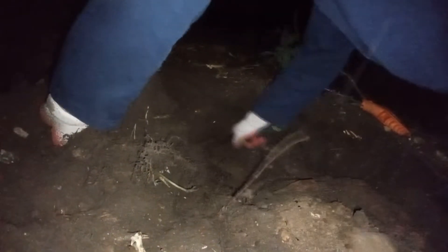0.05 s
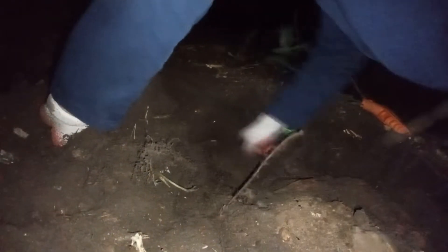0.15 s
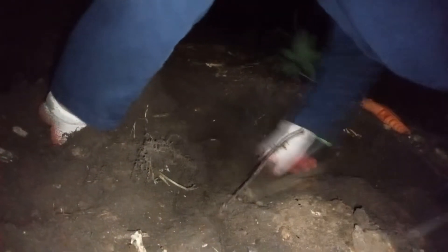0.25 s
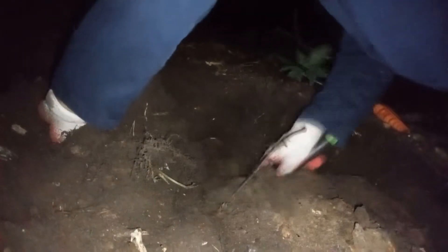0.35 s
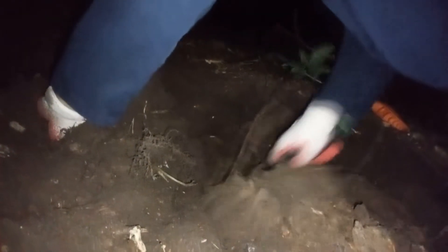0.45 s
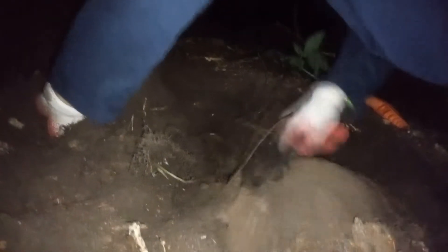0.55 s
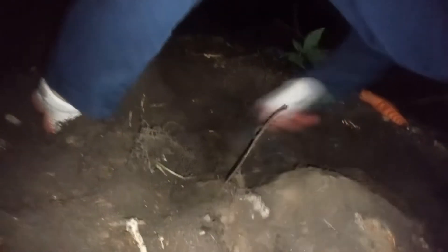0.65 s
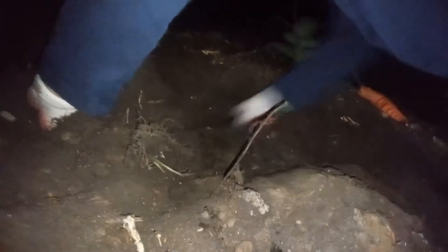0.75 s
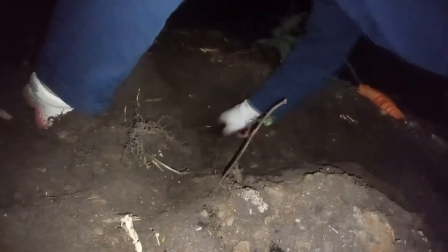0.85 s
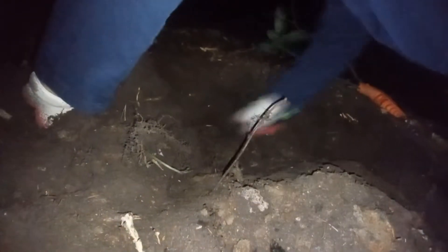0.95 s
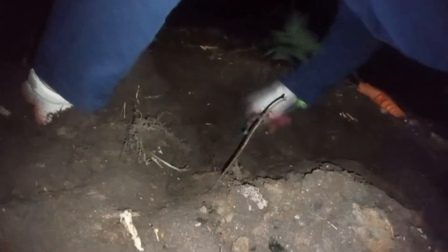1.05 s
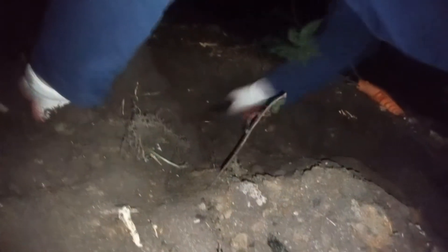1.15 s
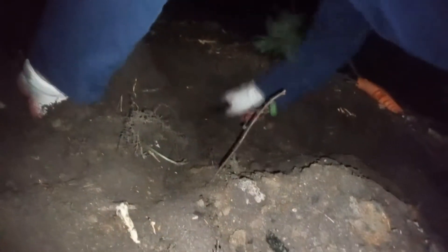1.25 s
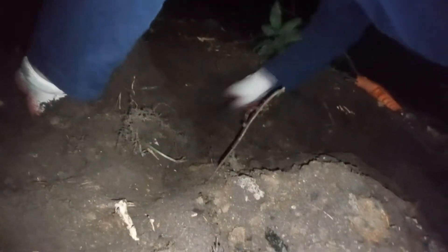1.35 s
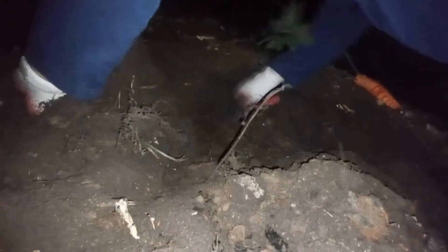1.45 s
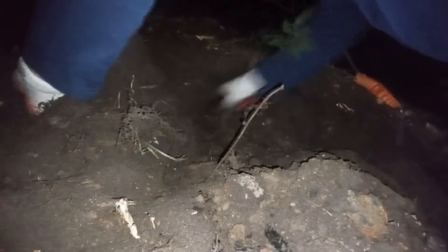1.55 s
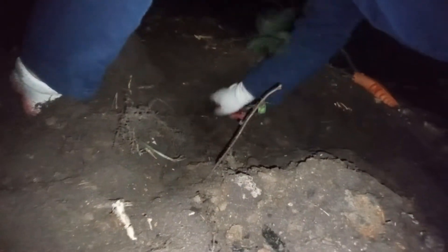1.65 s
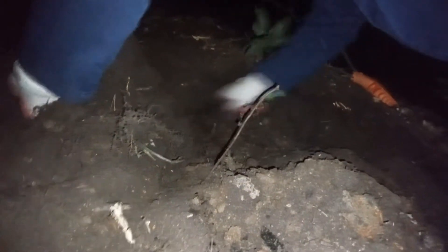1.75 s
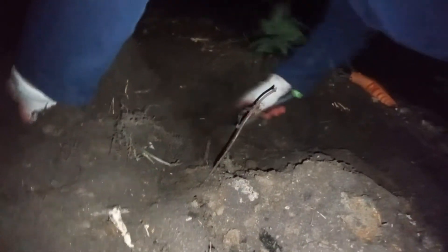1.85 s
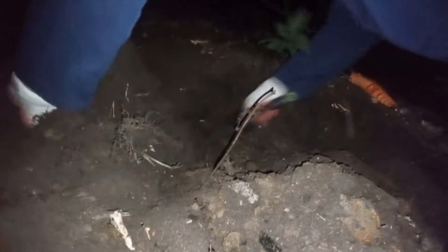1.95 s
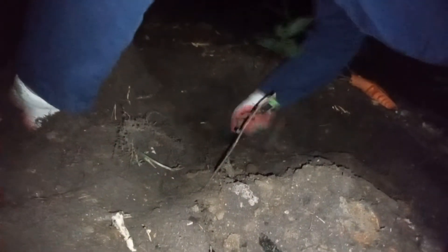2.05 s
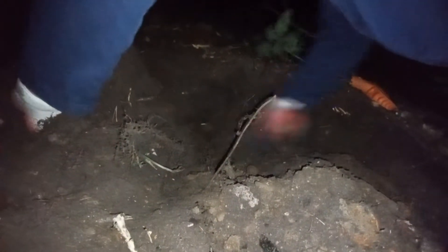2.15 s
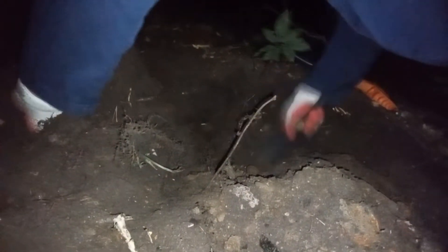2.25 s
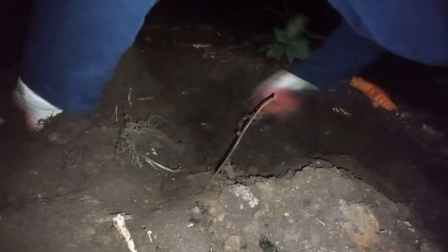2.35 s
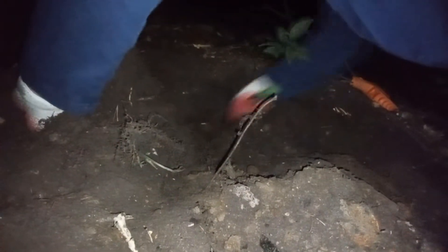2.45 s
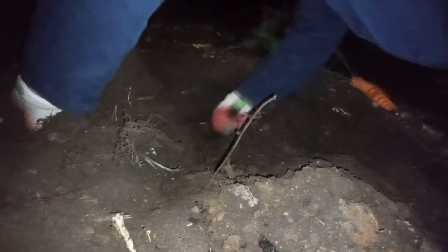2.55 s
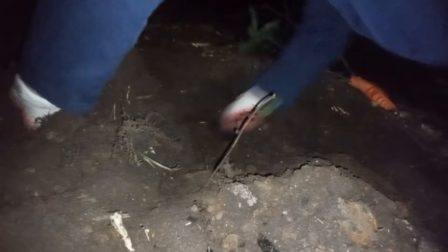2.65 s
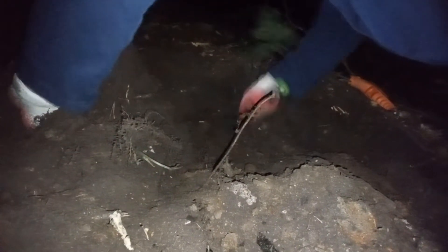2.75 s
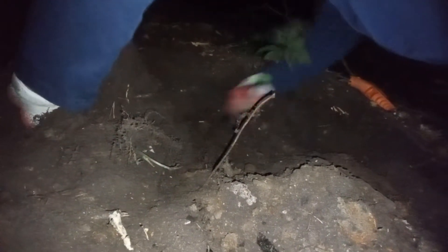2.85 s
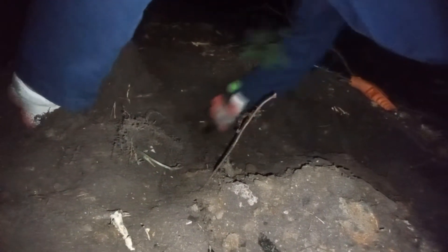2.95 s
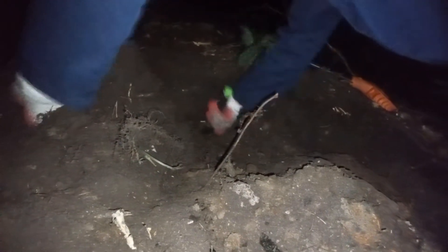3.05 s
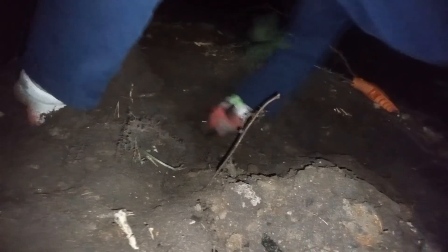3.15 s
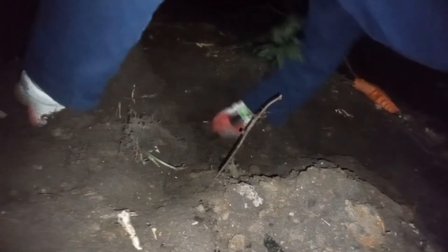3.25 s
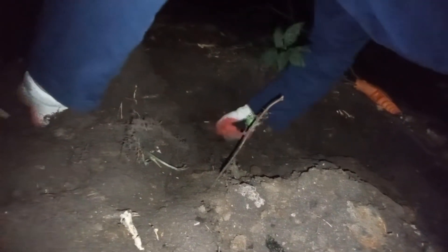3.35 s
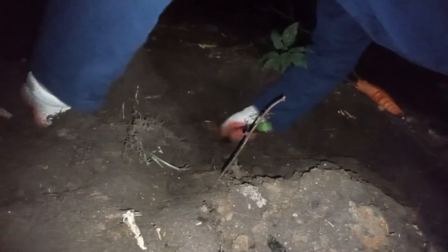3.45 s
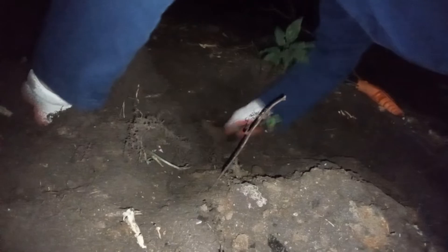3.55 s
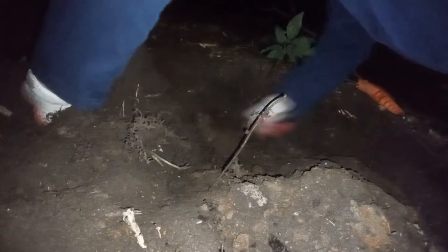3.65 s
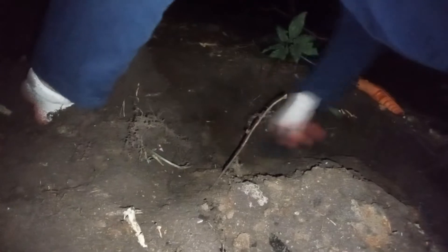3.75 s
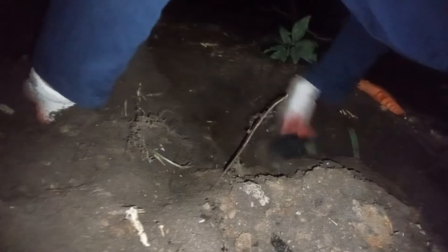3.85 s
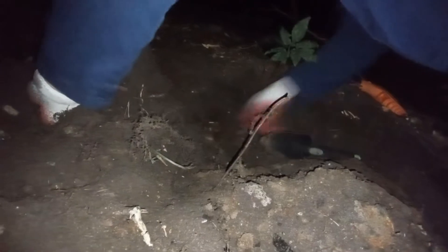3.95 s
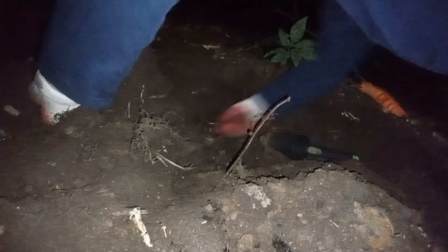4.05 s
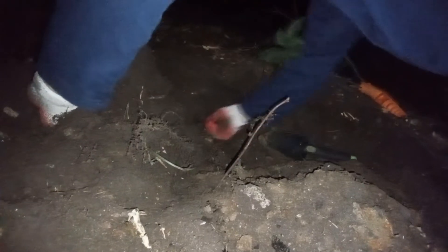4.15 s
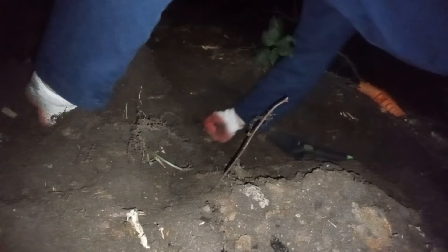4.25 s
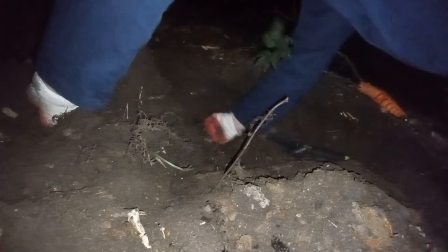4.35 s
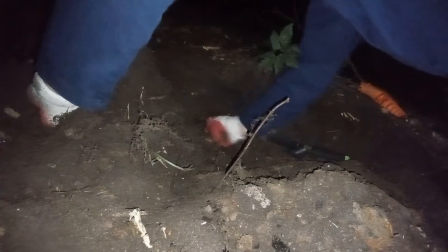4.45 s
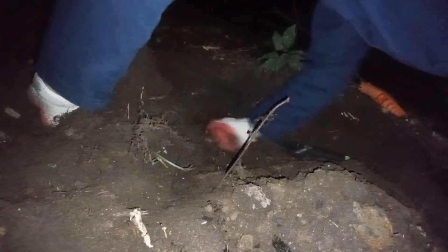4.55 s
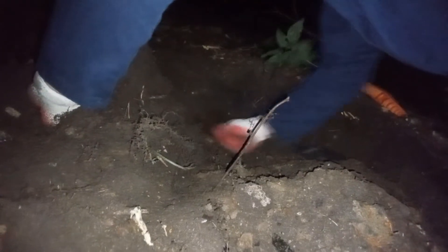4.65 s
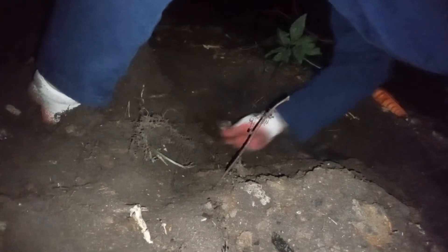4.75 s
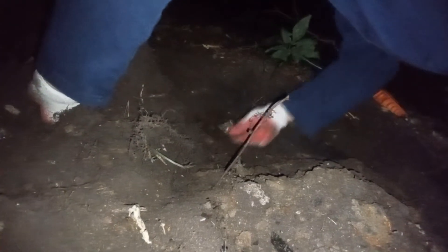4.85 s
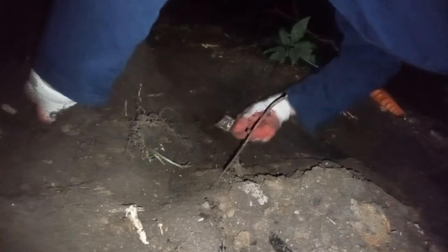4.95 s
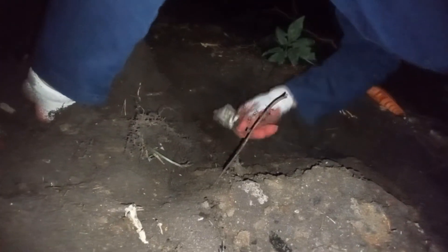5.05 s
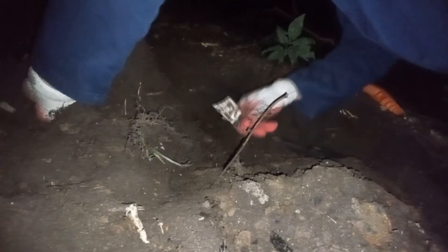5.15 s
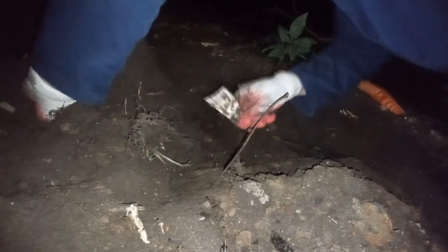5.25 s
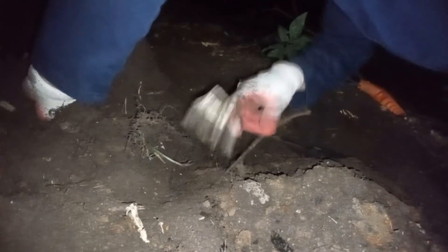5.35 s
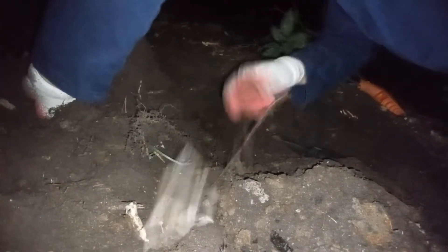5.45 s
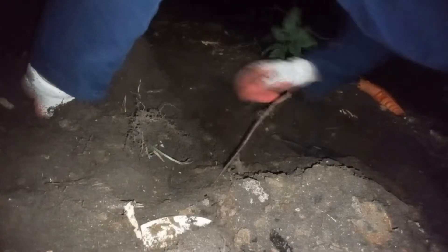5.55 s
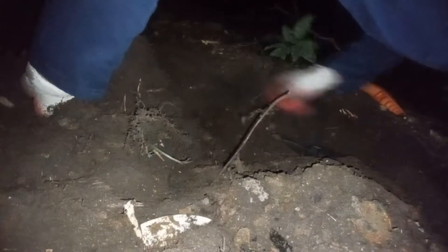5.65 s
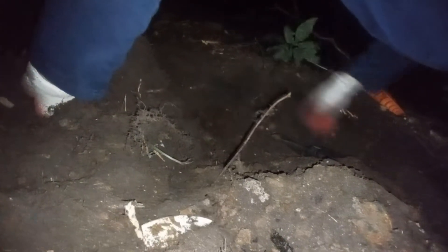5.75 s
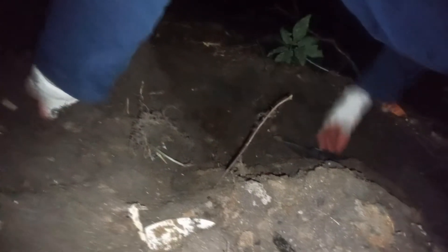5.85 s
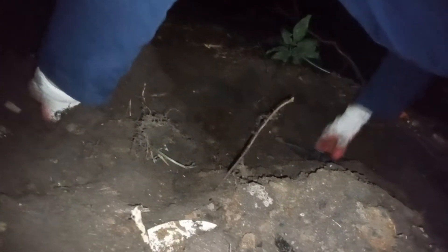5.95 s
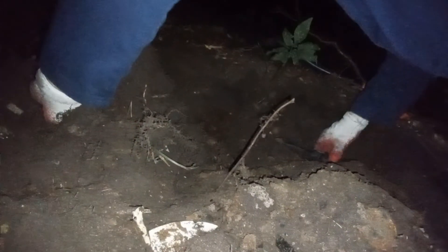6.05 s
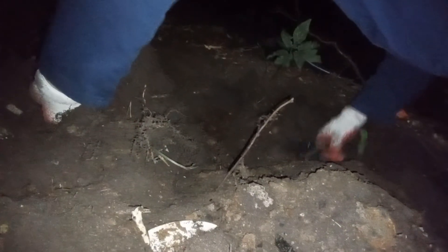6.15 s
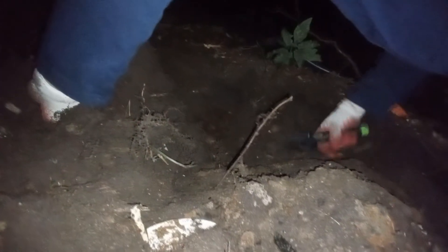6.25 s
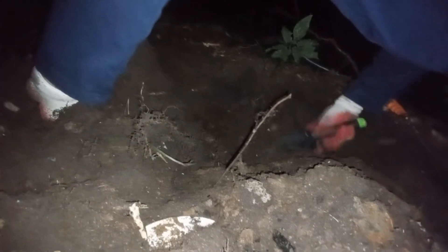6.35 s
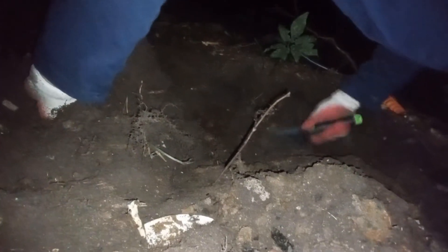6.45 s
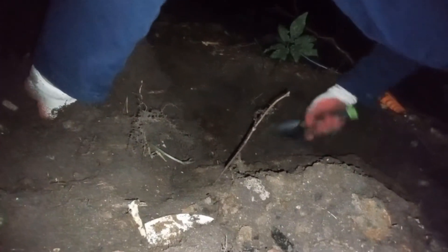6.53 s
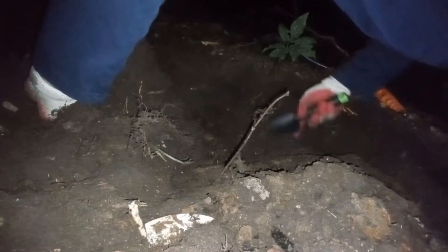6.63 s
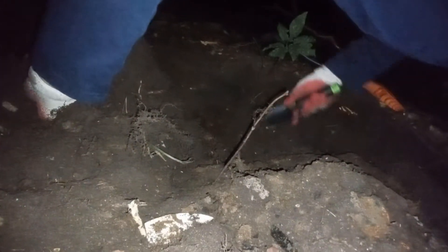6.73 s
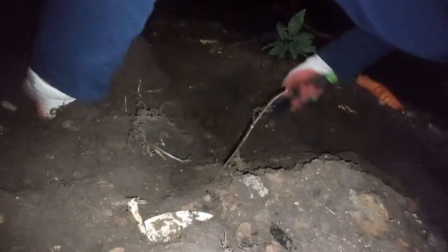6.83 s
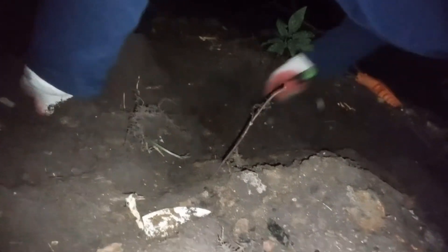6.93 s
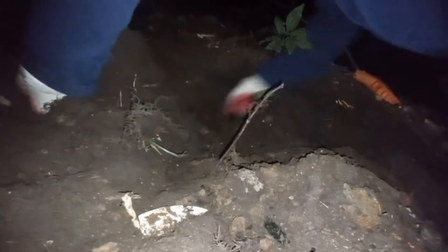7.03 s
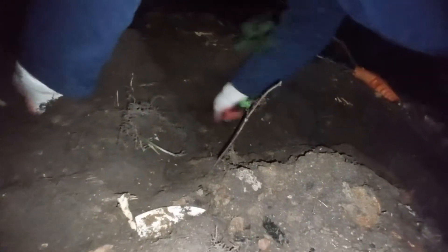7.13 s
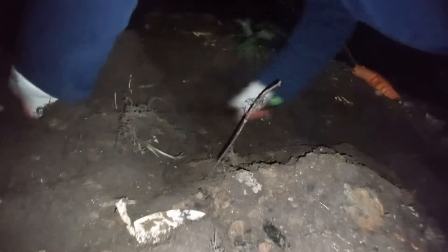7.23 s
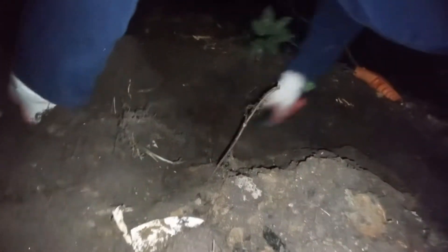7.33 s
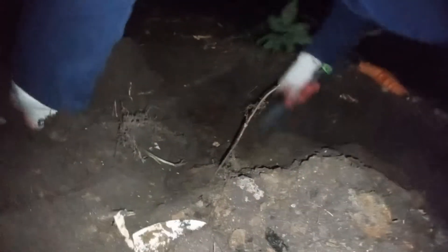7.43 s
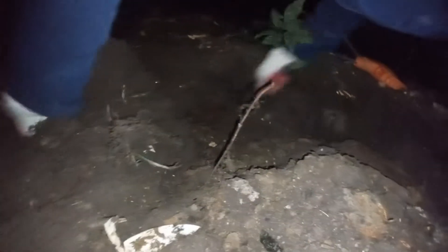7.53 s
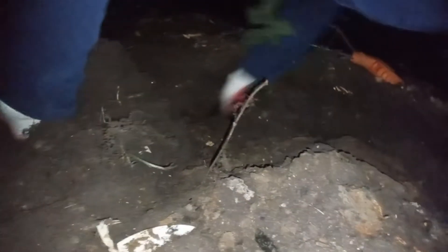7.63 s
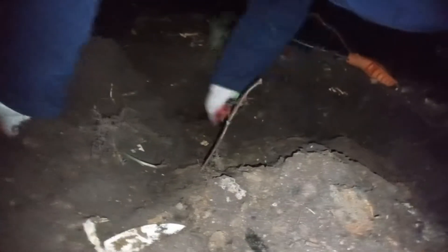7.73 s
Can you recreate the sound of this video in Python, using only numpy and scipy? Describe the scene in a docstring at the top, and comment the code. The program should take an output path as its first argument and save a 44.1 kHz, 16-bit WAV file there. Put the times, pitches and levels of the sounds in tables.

```python
"""Digging with a hand trowel at night

A hand trowel scrapes and digs close by, outdoors, in quick strokes through soil full of shards.
Sliding noise and cracks excite soil, steel blade and grit; a gloved hand sweeps with smooth swelling noise.
A dropped shard clinks as decaying modes and scatters grit; filtered noise makes far rumble and faint air.
"""
import sys
import numpy as np
from scipy import signal
from scipy.fft import rfft, irfft, next_fast_len
from scipy.io import wavfile
from scipy.ndimage import uniform_filter1d, map_coordinates

SR = 44100
rng = np.random.default_rng(int(sys.argv[2]) if len(sys.argv) > 2 else 0)


def log_audio(samples):
    """Write samples as a 16-bit WAV file to the path given in sys.argv[1]."""
    # one column per channel
    frames = np.atleast_2d(samples).T
    # limit to full scale, then quantise
    limited = np.clip(frames, -1, 1)
    pcm = np.round(limited * 32767).astype(np.int16)
    wavfile.write(sys.argv[1], SR, pcm)


N = 343539
SIZE = next_fast_len(N + 8192)  # transform length, padded so that filter tails do not wrap
HZ = np.fft.rfftfreq(SIZE, 1 / SR)

# stones and shards cracking on the blade:
# (t/s, relative level/dB, thud over it/dB, sparkle over it/dB)
CRACK_EVENTS = [(0.1907, -25.5, 3, -7), (0.1986, -22.5, -1.5, -13), (0.213, -30.5, -6, -7.5),
                (0.2176, -15, -7.5, -21), (0.2209, -11, -10.5, -13), (0.494, -36, -8, -10),
                (0.5897, -49, -31, -10), (0.6062, -44.5, -4, -14), (0.749, -55, -20, -1),
                (0.776, -24, -7.5, -8), (0.7907, -21, -15, 4), (0.8132, -28.5, 8, -15),
                (0.8616, -31.5, 6, -2.5), (0.9839, -21, 0.5, -27.5), (0.9902, -27.0, 7, -2),
                (0.9956, -32.5, 11.5, -3.5), (1.053, -28.5, -7, 1.5), (1.0717, -34.5, -15, 2),
                (1.0994, -60, -18.0, 15.5), (1.1429, -21, -19, -28), (1.149, -28, -16, -32),
                (1.177, -29, 2, 4), (1.2141, -32.5, 7.5, 6), (1.2331, -39, -21, 7),
                (1.2379, -40.5, -9, 11.5), (1.2481, -51, -11, 12.5), (1.2575, -44.5, -4.0, 19.5),
                (1.2696, -46, -4, 19), (1.2981, -57.5, -4, 22), (1.4946, -60.0, -7, 19.5),
                (1.542, -48.5, -15, 4), (1.583, -35, 11.5, 3.5), (1.5919, -22, 10, -5.5),
                (1.618, -37, 5, -6), (1.7649, -39, -11, -0.5), (2.0085, -25, -15, -11),
                (2.0487, -29.5, -6, -1), (2.1134, -31, 0, -4.5), (2.1789, -33, -21, 0),
                (2.204, -22, -18, -24), (2.2106, -16, -11, -23), (2.222, -21.5, 4, -12),
                (2.4738, -32, -29, 7), (2.4865, -28.5, -18.0, 10.5), (2.5221, -33.5, -19, 2),
                (2.8119, -34, -21, 7), (2.9049, -45.5, -6, 15), (2.9394, -31, 3, -28),
                (3.052, -49.5, -4, 19), (3.135, -74, -10, 20), (3.38, -62, -10, 16), (3.438, -31, -14, -8),
                (3.615, -35, -15, -3.5), (3.6511, -35.5, 7.5, -7), (3.9123, -68.5, -11, 28),
                (5.081, -59, -17, 22.5), (5.0868, -65, -16, 21), (6.323, -23.5, -36, -25),
                (6.5856, -38.5, -39, -19), (6.976, -23, -23, -6.5), (7.1268, -44.5, 13.5, -11),
                (7.29, -20.5, 4, -2.5), (7.3182, -39, 7, -27.5), (7.411, -59, -12, 6),
                (7.439, -37, -13.5, -3.5), (7.5563, -21, -2.5, -2), (7.565, -25.5, -15, 0.5),
                (7.584, -15, -7, -3), (7.591, -20, -7, 1), (7.7203, -28.5, -4, -3)]
# landing and bounces of a dropped shard: (t/s, relative level/dB)
SHARD_LANDINGS = [(5.4863, -17.5), (5.5007, -36.5), (5.5188, -44)]
# spectrum of fine grit: (f/Hz, relative level per Hz/dB)
GRIT_SPECTRUM = [(1000, -46.5), (2800, -7.5), (4000, -2), (5000, -0.5), (6600, 3), (8200, -7.5),
                 (11000, -2), (17000, -4.5)]
# spectrum of low rumble, far away or in the ground: (f/Hz, relative level per Hz/dB)
RUMBLE_SPECTRUM = [(12, -62.5), (20, -39), (52, -11.5), (102, 0), (173, -4.5), (252, -19.5), (400, -34),
                   (520, -60), (880, -120)]


def trowel():
    """Forced vibration: scraping and cracks shake three bodies, packed soil, blade and fine grit."""
    # packed soil: (f/Hz, relative level per Hz/dB)
    soil_spectrum = [(60, -41), (120, -12), (250, -6), (450, -5.5), (630, -0.5), (900, -4.5), (1300, -4.5),
                     (3000, -50), (17000, -73)]
    scrape, push, grit = strokes()
    level_db, thud_db, sparkle_db = np.transpose(CRACK_EVENTS)[1:]

    # the shared force makes the three bodies crunch partly together
    shared = crunch(grain_db=3.5, per_second=270, spread_db=3, slip=0.7)
    clods = unit(shared + 0.76 * crunch(grain_db=1.5, per_second=110, spread_db=4, slip=0.68))
    sand = unit(shared + 1.3 * crunch(grain_db=3, per_second=400, spread_db=4, slip=0.61))

    thuds = bursts(level_db + thud_db - 1, 0.008, ring=0.078, low_hz=395, high_hz=916, ring_t60=0.017)
    knocks = bursts(level_db + 0.5, 0.0054, ring=0.12, low_hz=1290, high_hz=2176, ring_t60=0.015)
    sparks = bursts(level_db + sparkle_db, 0.0091, ring=0.083, low_hz=3110, high_hz=14840, ring_t60=0.031)

    soil = filtered(push * patchy(clods, 3) + thuds, unit(causal(soil_spectrum)))
    blade = filtered(scrape * patchy(shared, 4) + knocks, unit(steel()))
    fine = grit * (patchy(sand, 3.5) + 0.17 * chips(0.0078, count=10)) + sparks
    # the ground gives way under the push, smoothed over 20 ms
    low_noise = unit(filtered(rng.standard_normal(N), causal(RUMBLE_SPECTRUM)))
    heave = amp(-13) * low_noise * uniform_filter1d(push, size=900)
    return heave + soil + blade + filtered(fine, unit(causal(GRIT_SPECTRUM)))


def strokes():
    """Amplitude envelopes: gains of scrape, soil push and grit, with settling soil and crumbs."""
    # scrape level through a turning moment: (start t/s, time to turn/s, time from turn to end/s,
    # relative scrape level/dB at start, at turn, at end, soil push over scrape/dB, grit over scrape/dB)
    stroke_events = [(0.0, 0.034, 0.04, -38, -58, -66.5, -1.5, -6.5),
                     (0.103, 0.02, 0.105, -60.5, -44.5, -47, -6, -8),
                     (0.23, 0.046, 0.011, -49.5, -38, -48, 0, -9),
                     (0.419, 0.073, 0.079, -73.5, -50, -79, -5, -8.5),
                     (0.777, 0.054, 0.05, -44, -41, -71, 4, -3),
                     (0.891, 0.096, 0.002, -67.5, -50.5, -48, 0, -11.5),
                     (0.971, 0.023, 0.022, -52, -35, -54, 0, -11.5),
                     (1.145, 0.022, 0.072, -43, -43, -46, -0.5, -5.5),
                     (1.246, 0.034, 0.041, -71, -59.5, -76, 3, 5),
                     (1.322, 0.037, 0.033, -52.5, -46, -52, 4, 0),
                     (1.541, 0.048, 0.041, -62, -46, -52, -2.5, 2),
                     (1.633, 0.01, 0.011, -51.5, -55.5, -51, 5, 13),
                     (1.703, 0.052, 0.034, -75, -48.5, -82.5, 7.5, 4.5),
                     (1.997, 0.052, 0.03, -56.5, -39.5, -48, -5.5, -9),
                     (2.107, 0.035, 0.056, -44, -38.5, -50, -12, -8),
                     (2.199, 0.028, 0.02, -30, -36, -72, -19, -15.5),
                     (2.447, 0.053, 0.0049, -49.5, -36.5, -41.5, -10, -2),
                     (2.504, 0.027, 0.014, -49, -40.5, -52, -2, -2),
                     (2.549, 0.021, 0.079, -59, -63.5, -71, -0.5, -1),
                     (2.639, 0.049, 0.025, -60, -32.5, -34.5, -3.5, -8),
                     (2.81, 0.063, 0.03, -58.5, -54, -52.5, -5.5, 0),
                     (2.901, 0.0104, 0.135, -59.5, -47.5, -63, 9.5, 2),
                     (3.047, 0.005, 0.046, -59, -58, -77, 9, 6),
                     (3.2, 0.17, 0.062, -76.5, -71, -66, 13, -4),
                     (3.438, 0.081, 0.04, -49, -63, -62, 1.5, -4),
                     (3.562, 0.089, 0.0089, -53, -45.5, -51, -0.5, -7.5),
                     (3.655, 0.15, 0.083, -66, -66, -90, -8.5, -1.5),
                     (6.973, 0.083, 0.058, -37.5, -33, -46.5, -4, -3.5),
                     (7.201, 0.085, 0.0188, -62, -44, -45.5, -0.5, -7),
                     (7.31, 0.039, 0.057, -48.5, -43, -54.5, 0, -6),
                     (7.554, 0.062, 0.0044, -37.5, -42, -39.5, -7, -0.5),
                     (7.621, 0.011, 0.093, -37.5, -37.5, -51, -3, 0),
                     (7.754, 0.037, 0.008, -72, -63, -60, 10, -0.5)]
    # crumbs trickling in the hole, one curve for each spell of digging: (t/s, relative level/dB)
    crumb_curves = [
        [(0.0, -68.5), (0.3, -62), (0.42, -78), (0.6, -70.5), (0.77, -78), (1.02, -71), (1.14, -75), (1.4, -88),
         (1.55, -81.5), (1.96, -93), (2.26, -75.5), (2.44, -96), (2.6, -76), (2.75, -89), (3.1, -83),
         (3.2, -83), (3.8, -79), (4.05, -99)],
        [(6.08, -90), (6.3, -76), (6.45, -82.5), (6.69, -84), (6.95, -74), (7.12, -65), (7.22, -71),
         (7.41, -70), (7.54, -82), (7.79, -66)],
    ]
    # relative level of the crumbs on blade, soil and grit: (level/dB, level/dB, level/dB)
    crumb_colour = [-6, -5.5, 0]
    slump_db, slump_t60 = -21.5, 0.15  # input gain in dB and decay in s of soil settling after a stroke
    edge = round(0.005 * SR)  # samples over which a stroke bites and lets go

    t, gains = np.arange(N) / SR, np.zeros((3, N))
    for start, to_turn, to_end, start_db, turn_db, end_db, push_db, grit_db in stroke_events:
        during = slice(round(start * SR), round((start + to_turn + to_end) * SR))
        knots = [0, to_turn, to_turn + to_end]
        scrape = amp(np.interp(t[during] - start, knots, [start_db, turn_db, end_db]))
        gains[:, during] += scrape * amp([[0], [push_db], [grit_db]])

    keep = amp(-60 / (slump_t60 * SR))  # one-pole decay per sample
    slump = amp(slump_db) * signal.lfilter([1 - keep], [1, -keep], gains, axis=1)
    crumbs = sum(amp(np.interp(t, *np.transpose(rows), left=-200, right=-200)) for rows in crumb_curves)
    return uniform_filter1d(gains, size=edge, axis=1) + slump + crumbs * amp(crumb_colour)[:, None]


def crunch(grain_db, per_second, spread_db, slip):
    """Stick-slip friction: clumpy sliding noise with slips of single grains on top."""
    clumps_db = 3.5 * wobble(60)
    slide = amp(clumps_db + grain_db * wobble(350)) * rng.standard_normal(N)
    strengths = amp(spread_db * np.minimum(rng.exponential(1, N), 4)) * rng.standard_normal(N)
    slips = (rng.random(N) < per_second / SR) * strengths
    return unit(unit(slide) + slip * unit(slips))


def bursts(level_db, t60, ring, low_hz, high_hz, ring_t60):
    """Impact excitation: each crack is a dying noise burst with two brief tones of the struck piece."""
    out, t = np.zeros(N + SR), np.arange(1800) / SR
    onset = 1 - np.exp(-t / 0.0003)
    for row, db in zip(CRACK_EVENTS, level_db):
        pitches = rng.uniform(low_hz, high_hz, (2, 1))
        tones = np.sin(2 * np.pi * pitches * t).sum(axis=0) * amp(-60 * t / ring_t60)
        crack = amp(-60 * t / t60) * rng.standard_normal(len(t))
        out[round(row[0] * SR):][:len(t)] += amp(db) * onset * (crack + ring * tones)
    return out[:N]


def steel():
    """Modal superposition: damped blade resonances, above which soft soil passes little."""
    # soil-damped steel: (f/Hz, width/Hz, relative level/dB)
    blade_modes = [(1360, 480, -2.5), (1890, 310, 2.5), (2264, 293, 0.5), (3440, 1000, -6)]
    modes = 0
    for k, (centre, width, db) in enumerate(blade_modes):
        resonance = 1j * HZ * width / (centre ** 2 - HZ ** 2 + 1j * HZ * width)
        modes = modes + (-1) ** k * amp(db) * resonance  # neighbours in opposite phase
    return modes / (1 + 1j * HZ / 3000) ** 2


def chips(t60, count):
    """Impulse response: small shards in the soil, ticked at random, each ring at their own pitch."""
    t, out = np.arange(1500) / SR, np.zeros(N)
    for hz in np.geomspace(1500, 12000, count):
        # 12 ticks a second on average
        ticks = (rng.random(N) < 12 / SR) * amp(4 * np.minimum(rng.exponential(1, N), 3))
        out += signal.oaconvolve(ticks, amp(-60 * t / t60) * np.sin(2 * np.pi * hz * t))[:N]
    return unit(out)


def patchy(x, depth_db):
    """Time-varying spectrum: the noise's colour shifts in random patches of time and pitch."""
    bins = signal.stft(x, nperseg=256)[2]
    across_pitch = uniform_filter1d(rng.standard_normal(bins.shape), size=5, axis=0)
    field = uniform_filter1d(across_pitch, size=9, axis=1)
    return unit(signal.istft(bins * amp(depth_db * unit(field)), nperseg=256)[1][:N])


def glove():
    """Amplitude-modulated noise: a gloved hand picks about and sweeps loose soil softly."""
    # sweeps in the hole: (middle t/s, length t/s, relative rustle level/dB)
    sweeps = [(4.167, 0.11, -73.5), (4.286, 0.033, -77), (4.391, 0.024, -73.5), (4.5, 0.2, -78.5),
              (4.691, 0.1, -80), (5.101, 0.099, -71), (5.326, 0.053, -75.5), (5.379, 0.085, -75),
              (5.45, 0.18, -79), (5.902, 0.04, -87), (5.965, 0.052, -75), (6.138, 0.073, -69.5),
              (6.196, 0.087, -61.5), (6.268, 0.094, -65.5), (6.34, 0.088, -63.5), (6.525, 0.16, -62.5),
              (6.619, 0.091, -62.5), (6.807, 0.16, -65), (6.899, 0.07, -65.5)]
    # a firm sweep has equal swish and rustle gains; the swish falls off faster in lighter ones
    firm_db, swish_grows = -57, 1.4
    swells = np.zeros((2, N))
    for middle, length, db in sweeps:
        swell = np.hanning(round(length * SR))
        swish_db = firm_db + swish_grows * (db - firm_db)
        start = round((middle - length / 2) * SR)
        swells[:, start:][:, :len(swell)] += swell * amp([[swish_db], [db]])
    swish = filtered(patchy(rng.standard_normal(N), 2.5), unit(steel()))
    rustle = filtered(patchy(rng.standard_normal(N), 4), unit(causal(GRIT_SPECTRUM)))
    return amp(1.2 * wobble(65)) * (swells[0] * swish + swells[1] * rustle)


def shard():
    """Modal decay: each landing rings the shard's modes at new strengths, with a short knock."""
    # modes of the shard: (f/Hz, mean relative level/dB, t60/s)
    shard_modes = [(2604, -10.5, 0.037), (4270, -6, 0.02), (6450, 4.5, 0.017), (8280, -7, 0.026),
                   (10200, -9.5, 0.0092), (11730, 1.5, 0.021), (13750, -3, .008)]
    out, t = np.zeros(N + SR), np.arange(SR // 10) / SR
    onset = 1 - np.exp(-t / 0.0004)
    for s, db in SHARD_LANDINGS:
        ring = np.zeros(len(t))
        for hz, mode_db, t60 in shard_modes:
            ring += amp(mode_db + rng.normal(0, 1.5) - 60 * t / t60) * np.sin(2 * np.pi * hz * t)
        knock = 1.5 * amp(-60 * t / 0.006) * uniform_filter1d(rng.standard_normal(len(t)), size=3)
        out[round(s * SR):][:len(t)] += amp(db - 6) * (ring + knock) * onset
    return out[:N]


def scatter():
    """Exponentially decaying noise: the first landing throws up grit that patters down."""
    scatter_db, scatter_t60 = -29, 0.13  # dB relative to the landing's table level, decay in s
    s, db = SHARD_LANDINGS[0]
    since = np.arange(N) / SR - s
    decay = (since >= 0) * amp(db + scatter_db - 60 * np.abs(since) / scatter_t60)
    patter = decay * crunch(grain_db=3.5, per_second=480, spread_db=3, slip=0.6)
    return filtered(patter, unit(causal(GRIT_SPECTRUM)) + amp(-3) * unit(steel()))


def night():
    """Spectrally shaped noise: a lumpy far rumble over a faint hiss of open air."""
    # distant rumble before the microphone: (t/s, level/dB)
    far_levels = [(0.0, -60), (2.5, -62), (4.21, -60.5), (4.5, -67.5), (4.73, -60), (6.75, -60.5),
                  (7.79, -58)]
    # night air: (f/Hz, relative level per Hz/dB)
    air_spectrum = [(200, -1), (330, -2), (780, -10.5), (2000, -17.5), (4000, -22.5), (7000, -28),
                    (9500, -27), (12000, -30), (17000, -44.5)]
    lumps = amp(2.2 * wobble(17) + 0.98 * wobble(3))
    rumble = unit(lumps * filtered(rng.standard_normal(N), causal(RUMBLE_SPECTRUM)))
    far_db = np.interp(np.arange(N) / SR, *np.transpose(far_levels))
    air = unit(filtered(rng.standard_normal(N), causal(air_spectrum)))
    return amp(far_db) * rumble + amp(-80 + 1.5 * wobble(0.98)) * air


def amp(db):
    """Logarithmic level: decibels to amplitude gain."""
    return 10 ** (np.asarray(db) / 20)


def unit(x):
    """Root-mean-square normalisation: x scaled to rms 1."""
    return x / np.sqrt(np.mean(np.abs(x) ** 2) + 1e-20)


def wobble(rate):
    """Spline interpolation: a smooth random curve with rate knots a second."""
    knots = rng.standard_normal(int(N * rate / SR) + 4)
    return map_coordinates(knots, [np.arange(N) * rate / SR])


def causal(points):
    """Minimum phase by a folded cepstrum: response through (f/Hz, level/dB) on a log axis."""
    f, db = np.transpose(points)
    cepstrum = irfft(np.log(amp(np.interp(np.log(HZ + 1), np.log(f), db))), SIZE)
    cepstrum[1:SIZE // 2] *= 2
    cepstrum[SIZE // 2 + 1:] = 0
    return np.exp(rfft(cepstrum))


def filtered(x, response):
    """Convolution theorem: x through a frequency response."""
    return irfft(rfft(x, SIZE) * response, SIZE)[:N]


def scene():
    """Superposition: digging, glove and shard in the hole, night behind."""
    return (trowel() + glove() + shard() + scatter() + night())[None]


def record(dry):
    """Linear filtering: the microphone port colours the treble, and a band limit ends it."""
    # microphone port: (f/Hz, level/dB)
    port_response = [(8000, 0.5), (9300, 7.5), (11200, -3.5), (12800, -9.5), (14000, -7), (15000, 6.5),
                     (15700, 8), (16200, -21.5), (17000, -26)]
    top_hz = 16900
    coloured = filtered(dry[0], causal(port_response))
    return filtered(coloured, HZ < top_hz)[None]


dry = scene()
out = record(dry)
log_audio(out)
```